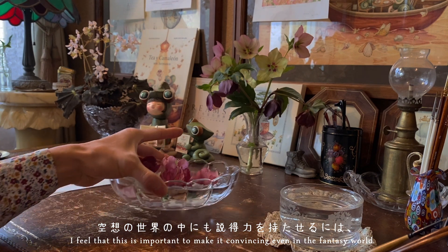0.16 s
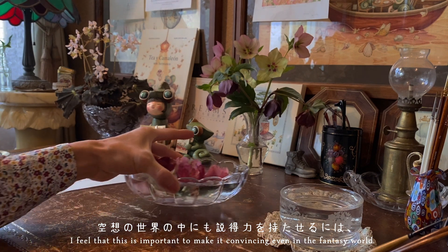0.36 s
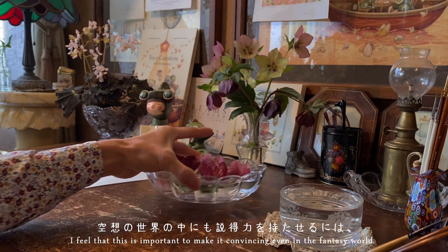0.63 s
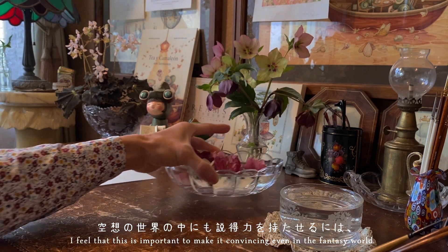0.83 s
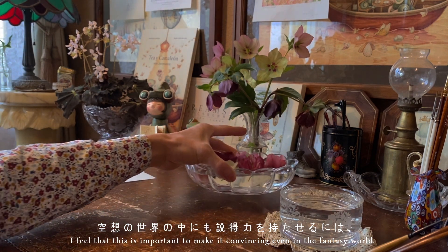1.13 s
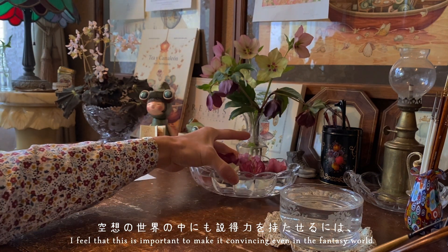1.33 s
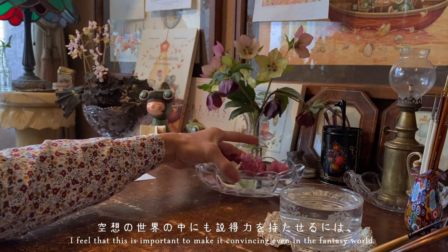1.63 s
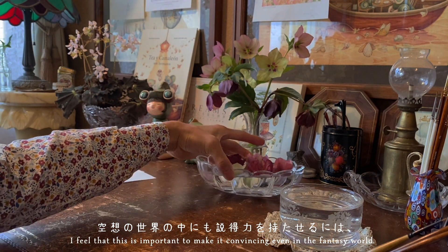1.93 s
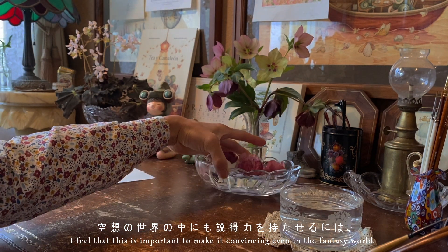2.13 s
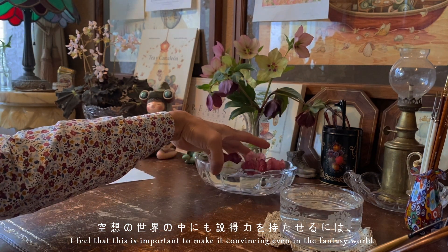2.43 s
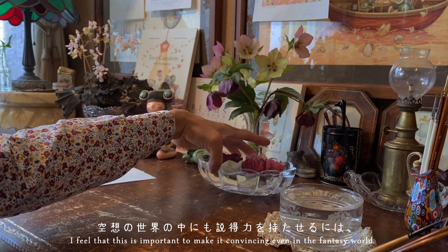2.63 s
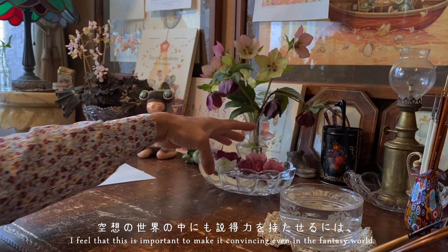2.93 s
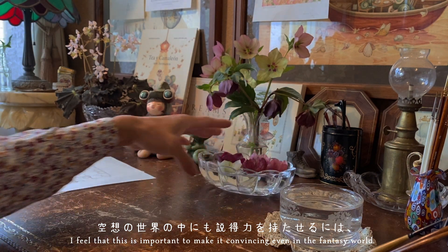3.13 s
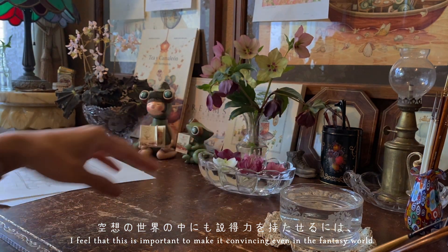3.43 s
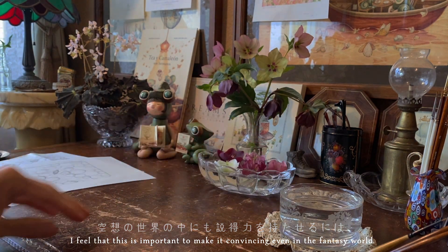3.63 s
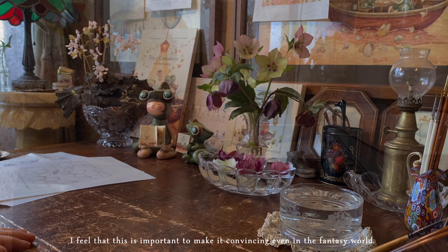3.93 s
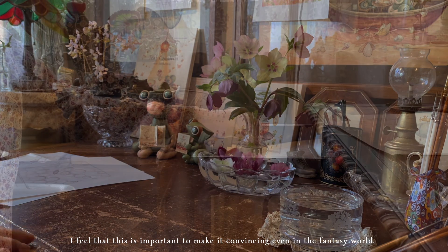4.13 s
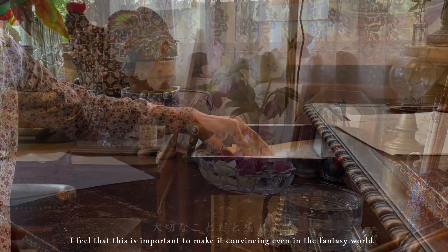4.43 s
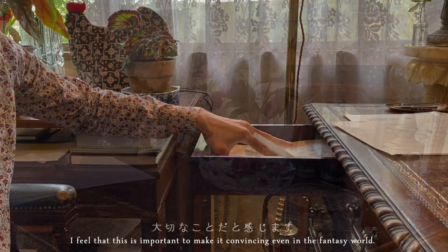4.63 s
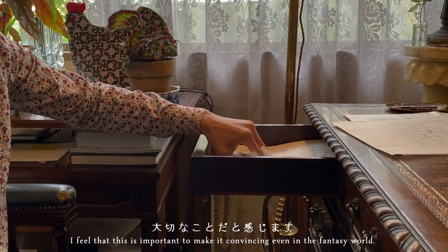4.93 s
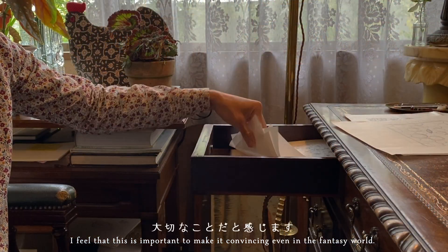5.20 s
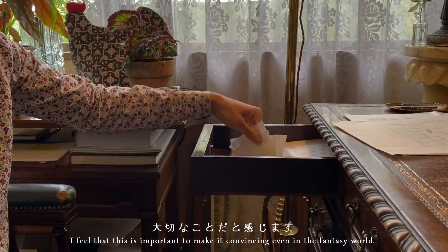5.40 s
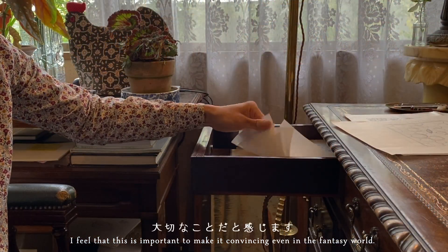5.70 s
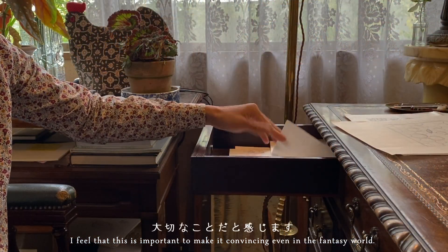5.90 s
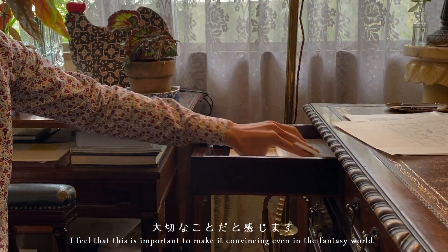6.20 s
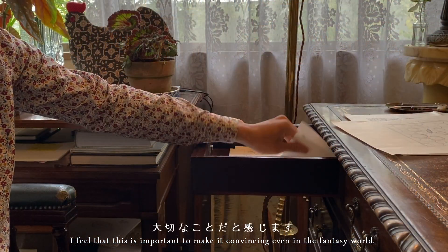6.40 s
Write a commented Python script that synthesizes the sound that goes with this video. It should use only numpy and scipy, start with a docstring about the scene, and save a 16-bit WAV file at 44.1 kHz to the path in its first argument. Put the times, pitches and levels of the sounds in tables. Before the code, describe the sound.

A small, quiet furnished room, heard close in stereo, with a faint low rumble and very soft hiss. From 0 s a sleeve brushes softly; tiny glass ticks come at about 0.1 s, the clearest at 0.17. The cloth swells gently around 1 s. At 1.28 a glass bowl lands on the wooden desk: a deep, loud, quickly dying thump with a slight rattle and clink. Softer bumps and glass ticks follow from 1.58 to 1.84, then near quiet, with barely audible glass touches at 2.8. From 3.4 a hand lightly slides paper. At 4.43 a small knock; from 4.75 the rustling grows firmer, with hard wooden knocks and snaps at 4.87 and 5.0. A very sharp paper snap cracks at 5.31, lesser flicks around 5.75, then knocks at 5.88, 6.07 and 6.29, the last with another snap, as sheets keep scraping to the end.

```python
"""Glass bowl on a desk, papers in a drawer

A sleeve brushes over a wooden desk (soft noise) and a glass bowl is set down with a deep thump (ringing wood)
and a few small clinks (hard ticks with a faint ring). Then a hand leafs through papers in an open drawer:
sheets slide and snap (shaped noise), fingers and paper edges knock on the wood (noise bursts and ringing).
A small, quiet, furnished room adds short echoes; it is heard from close by through a stereo pair of microphone ports."""
import sys
import numpy as np
from scipy import signal
from scipy.fft import rfft, irfft
from scipy.io import wavfile
from scipy.ndimage import uniform_filter1d

SR = 44100
rng = np.random.default_rng(int(sys.argv[2]) if len(sys.argv) > 2 else 0)


def materialize(psi):
    """Save the field psi as 16-bit PCM at rate SR to the path in sys.argv[1].

    A 1-D psi becomes a single channel; in a 2-D psi each row is a channel.
    """
    bounded = np.clip(np.atleast_2d(psi).T, -1, 1)
    quanta = np.round(bounded * 32767).astype(np.int16)
    wavfile.write(sys.argv[1], SR, quanta)


N = 289296  # length [samples]
TIME = np.arange(N) / SR  # [s]
HIT_TIME = TIME[:SR // 2]  # half a second, enough for one short sound [s]


def undb(db):
    """Turn decibels into a gain."""
    return 10 ** (np.asarray(db) / 20)


def unit(x):
    """Scale to an rms level of 1."""
    return x / np.sqrt(np.mean(x ** 2))


def convolve(x, response):
    """Filter along time, keeping the length."""
    filtered = signal.fftconvolve(np.atleast_2d(x), np.atleast_2d(response), axes=1)
    return filtered[:, :x.shape[-1]]


def colour(x, points, tilt_db=0, size=4096):
    """Filter with unit energy through (Hz, dB) points, tilted by tilt_db per octave above 300 Hz."""
    point_hz, point_db = np.transpose(points)
    bin_hz = np.maximum(np.arange(size // 2 + 1), 1) * SR / size
    octave = np.log2(bin_hz)
    db = np.interp(octave, np.log2(point_hz), point_db)
    db = db + tilt_db * np.clip(octave, np.log2(300), None)
    # fold the cepstrum (the spectrum of the log gains) so that the filter responds at once, never early
    cepstrum = irfft(np.log(undb(db)))
    cepstrum[1:size // 2] *= 2
    cepstrum[size // 2 + 1:] = 0
    response = irfft(np.exp(rfft(cepstrum)))
    return convolve(x, response / np.linalg.norm(response))


def stereo_noise(count, width):
    """Left and right noise with a shared part; width is the side level over the mid level."""
    mid, side = rng.standard_normal((2, count))
    return np.array([mid + width * side, mid - width * side]) / np.hypot(1, width)


def walk(rate):
    """Smooth random wandering around zero, with about rate new values a second and a spread near 1."""
    hold = int(SR / rate)
    steps = np.repeat(rng.standard_normal(N // hold + 1), hold)
    return unit(uniform_filter1d(steps, hold)[:N])


def ring(modes, spread, favoured_hz=500, favour_db=0):
    """Sum of decaying tones; the place of the blow favours those near one pitch, by favour_db per octave."""
    out = 0
    for k, (hz, db, t60) in enumerate(modes):
        sign = (-1) ** k
        gain = sign * undb(db - favour_db * abs(np.log2(hz / favoured_hz)))
        # up to 400 Hz, the shorter the wave, the more its phase differs between left and right
        side_phase = spread * min(hz / 400, 1) ** 2 * (-1) ** (k // 2)
        phase = side_phase * np.array([[1], [-1]]) + rng.uniform(-1.3, 1)
        fade = np.exp(-np.log(1000) * HIT_TIME / t60)  # falls 60 dB in t60
        out = out + gain * fade * np.sin(2 * np.pi * hz * HIT_TIME + phase)
    return out / np.linalg.norm(undb(np.array(modes)[:, 1]))


def burst(ms, width, crack):
    """A dying swarm of micro-contacts (fading noise), led by a sharp first contact of size crack."""
    fade = np.exp(-HIT_TIME * 1000 / max(ms, .3))
    out = stereo_noise(len(HIT_TIME), width) * fade / 2
    out[:, 0] += crack
    return out


def add(track, s, sound):
    """Mix a sound into the track at time s [s]."""
    i = int(s * SR)
    track[:, i:i + sound.shape[1]] += sound[:, :N - i]


def pan(x, left_db):
    """Make the left louder than the right by left_db."""
    return x * undb(np.array([[left_db], [-left_db]]) / 2)


def friction(width, grain_db, flutter_db):
    """Fibres catch and let go: noise with fine grains (grain_db) under an unsteady pressure (flutter_db)."""
    level_db = grain_db * walk(1800) + flutter_db * walk(55)
    return unit(stereo_noise(N, width) * undb(level_db))


def crackle(rate, spread_db):
    """Tiny creases give way: lone clicks, rate a second; with spread_db above 0 a few are louder."""
    happens = rng.random(N) < rate / SR
    sign = rng.choice([-1, 1], N)
    size = undb(spread_db * np.minimum(rng.exponential(size=N), 3))
    return unit(happens * sign * size)


def patchy(x, patchy_db, rate):
    """A bending sheet changes its resonances: every third of an octave swells and fades alone."""
    out = 0
    for low in 200 * 2 ** (np.arange(19) / 3):
        high = low * 2 ** (1 / 3)
        band = signal.sosfilt(signal.butter(2, [low, high], "band", fs=SR, output="sos"), x)
        out = -out + band * undb(patchy_db * walk(rate))  # neighbouring bands get opposite signs
    return unit(out)


def air():
    """Steady background: a rumble alike on both sides and a faint, wider hiss, both from filtered noise."""
    # colour of the quiet room: (frequency [Hz], level [dB])
    room_tone = [(20, -15), (35, -12.5), (58, -2), (85, -6.5), (115, -8), (250, -19), (500, -28),
                 (1000, -35.5), (2500, -40), (6000, -45), (10000, -45.5), (15500, -55.5)]
    mid, side = colour(rng.standard_normal((2, N)), room_tone)
    side = signal.sosfilt(signal.butter(2, 260, "high", fs=SR, output="sos"), side)
    return undb(-60.5) * (mid + 0.85 * side * np.array([[1], [-1]]))


def room(x, early_db, early_s, tail_db, t60):
    """Near furniture scatters the sound at once; a short tail follows (both are fading noise echoes)."""
    count = len(HIT_TIME)
    arrive = HIT_TIME > .003  # no echo in the first 3 ms
    early = stereo_noise(count, width=0.99) * arrive * np.exp(-HIT_TIME / early_s)
    tail = stereo_noise(count, width=0.87) * arrive * np.exp(-np.log(1000) * HIT_TIME / t60)
    echoes = (undb(early_db) * unit(early) + undb(tail_db) * unit(tail)) / np.sqrt(count)
    echoes = colour(echoes, [(100, -23.0), (400, 5), (1500, 3.5), (6000, -1.5), (16000, 0.5)])
    return x + convolve(x, echoes)


def sleeve():
    """Cloth brushes softly as the arm reaches over the desk and draws back: noise in bell-shaped swells."""
    # moves of the arm: (middle [s], half length [s], level [dB])
    arm_moves = [(0.084, 0.17, -56.5), (0.444, 0.18, -60.5), (0.977, 0.41, -56.5), (1.445, 0.24, -61),
                 (1.835, 0.2, -65), (3.199, 0.3, -69)]
    # colour of the cloth: (frequency [Hz], level [dB])
    cloth_colour = [(150, 8.5), (400, 0.5), (800, -6), (1500, -7), (3000, -6), (5500, -11.5), (8000, -11),
                    (12000, -15), (16000, -21)]
    power = 0
    for middle, half, db in arm_moves:
        bell = np.exp(-((TIME - middle) / half) ** 2)
        power = power + (undb(db) * bell) ** 2
    cloth = friction(width=0.53, grain_db=-0.5, flutter_db=1.5)
    return np.sqrt(power) * colour(cloth, cloth_colour)


def desk():
    """Each push rings the desk; a longer, softer contact leaves only its low modes."""
    # weight coming down on the desk: (time [s], level [dB], contact time [ms])
    thumps = [(1.2741, -4.5, 1.88), (1.283, -2.5, 5.1), (1.39, -31.5, 2.2), (1.579, -48.5, 1.6),
              (1.623, -25, 6.5), (1.646, -20, 14), (1.837, -25, 6.6), (3.611, -44, 1.6), (4.653, -40, 3.9),
              (4.795, -44, 2.8), (4.872, -34, 1.77), (4.99, -36, 2.8), (5.14, -32, 4.9), (5.312, -36, 1.7),
              (6.398, -32, 4.4), (6.472, -36, 2.5)]
    # ringing modes of the desk: (frequency [Hz], level [dB], time to fall 60 dB [s])
    desk_modes = [(62.4, -4.5, 0.29), (83, -17.5, 0.43), (110, -6.5, 0.278), (126.6, 0, 0.26),
                  (156.1, 0.5, 0.2), (190, -12.5, 0.31), (234, -2, 0.33), (263, -10, 0.23), (298, -6, 0.17),
                  (328.6, -1.5, 0.25), (367, 1.5, 0.21), (395.5, -7.5, .11), (460, -7.5, .12),
                  (463, -9.5, 0.078), (542, 0, 0.081), (568, -2, 0.061), (600, -4.5, .06),
                  (748, -12.5, 0.13)]
    # colour of the rattle: (frequency [Hz], level [dB])
    rattle_colour = [(300, -3.5), (700, 3.5), (1300, -3), (2600, -9), (5000, -18), (12000, -27)]
    thump, rattle = np.zeros((2, 2, N))
    # the top first flexes briefly under the load, then its modes take over
    flex = np.exp(-HIT_TIME / .004) * np.sin(2 * np.pi * 400 * HIT_TIME)
    body = ring(desk_modes, spread=0.7) + undb(2.5) * flex
    for s, db, ms in thumps:
        push = np.sin(np.pi * np.minimum(HIT_TIME * 1000 / ms, 1)) ** 2
        add(thump, s, undb(db) * convolve(body, push / push.sum()))
        # the harder and shorter the jolt, the more the small things standing on the desk rattle
        add(rattle, s, undb(db) * undb(-25) / ms * burst(ms=34, width=0.65, crack=1.9))
    thump = signal.sosfilt(signal.butter(4, [52, 700], "band", fs=SR, output="sos"), thump)
    return thump + colour(rattle, rattle_colour)


def bowl():
    """Glass touches glass and wood: small hard ticks, each with a ring of the glass."""
    # touches: (time [s], level [dB], tilt [dB per octave], ring [dB re the level], favoured pitch [Hz])
    clinks = [(0.078, -44, -1, -30, 5000), (0.097, -40.5, 0, -15, 7000), (.173, -27, 1, -23, 1400),
              (1.285, -29, -2, -20, 5100), (1.581, -37.5, -6.5, -25, 1320), (1.786, -44, -6, -25, 1320),
              (1.8097, -34.5, -0.5, -16, 5400), (1.83, -52, 0, 7, 1320), (2.816, -61.5, 2, 1.5, 3000),
              (2.862, -78, -4, 18, 1320)]
    # ringing modes of the glass: (frequency [Hz], level [dB], time to fall 60 dB [s])
    glass_modes = [(1340, -2.5, 0.1), (2530, -13, 0.18), (5100, -0.5, 0.087), (5500, -10.5, .11),
                   (7350, -13.5, .14)]
    # colour of the tick: (frequency [Hz], level [dB])
    tick_colour = [(150, 6), (500, -5), (1400, 3.5), (3000, -10.5), (7500, -7), (12000, -8.5), (16000, -12)]
    out = np.zeros((2, N))
    for s, db, tilt_db, ring_db, favoured_hz in clinks:
        tick = colour(burst(ms=4.8, width=0.75, crack=0.21), tick_colour, tilt_db)
        glass = ring(glass_modes, 1.0, favoured_hz, favour_db=7)
        add(out, s, undb(db) * (tick + undb(ring_db) * glass))
    return out


def drawer():
    """Knocks chatter on the box, ring its modes and land once more just after."""
    # knocks: (time [s], level [dB], tilt [dB per octave], chatter time [ms], favoured pitch [Hz],
    #          ring [dB re the level], rebound [dB re the level])
    knocks = [(3.428, -46.5, -2.5, 23.5, 990, -0.5, -7), (4.417, -38.5, 8, 32, 1000, 2, -10),
              (4.434, -22, 1, 8, 4600, 3, -14), (4.584, -34.5, -0.5, 22, 660, 7.5, -4),
              (4.872, -14, -2, 3, 1570, 4, -14), (4.980, -21, 2.5, 13.3, 990, 2, -2),
              (5.003, -24.5, -2.5, 7.3, 375, -1, -8), (5.877, -24, -2, 7.4, 1700, -28, -12),
              (6.066, -16, -1.5, 9.4, 784, -1, -1.5), (6.286, -14.5, 4, 10.2, 378, -3.5, -6.5),
              (6.338, -30.5, -5, 25, 705, -8, -8), (6.399, -29.5, -1, 10.6, 1020, 4.5, -2)]
    # ringing modes of the drawer box: (frequency [Hz], level [dB], time to fall 60 dB [s])
    box_modes = [(250, -10, 0.13), (375, 0, 0.13), (668, 0, 0.13), (695, 2.5, 0.084), (759, -2, 0.09),
                 (936, 2, 0.08), (1045, -3, 0.089), (1173, -3, .09), (1313, 4, 0.023), (1622, -1, 0.08),
                 (1769, -1, .085), (1878, 2.5, 0.08), (2430, 0, 0.039), (3430, -4, .03), (4216, -2, .05),
                 (4652, -4, .07)]
    # colour of the chatter: (frequency [Hz], level [dB])
    knock_colour = [(80, -29.5), (250, -7.5), (550, -2.5), (1000, 1), (2000, 3), (2800, 0), (4200, 2),
                    (7000, -9.5), (11000, -17.5), (16000, -31)]
    # the sheet or finger lands a second time and chatters longer
    rebound_s, rebound_longer = .0085, 1.42  # delay [s], times the first chatter
    out = np.zeros((2, N))
    for s, db, tilt_db, ms, favoured_hz, ring_db, rebound_db in knocks:
        first = colour(burst(ms, width=0.39, crack=3.0), knock_colour, tilt_db)
        second = colour(burst(ms * rebound_longer, width=0.58, crack=1.6), knock_colour, tilt_db)
        wood = ring(box_modes, .45, favoured_hz, favour_db=11)
        add(out, s, undb(db) * (first + undb(ring_db) * wood))
        add(out, s + rebound_s, undb(db + rebound_db) * second)
    return out


def snaps():
    """A sheet buckles or flicks off a fingertip: a brief noise; the longer the crinkle, the softer its start."""
    # snaps: (time [s], level [dB], crinkle time [ms])
    flicks = [(3.672, -33.5, 2.6), (4.871, -15, 9.1), (4.962, -24, 10), (4.984, -13, 4.5),
              (5.154, -21.5, 12), (5.3087, -2.5, 1.87), (5.315, -19.5, 7.4), (5.338, -25, 6.9),
              (5.571, -29.5, 17), (5.736, -17.5, 2.2), (5.791, -22, 6.1), (6.289, -9, 3.2)]
    # colour of the snap: (frequency [Hz], level [dB])
    snap_colour = [(150, -3), (600, -13), (1500, -4), (4000, -2.5), (7200, 4.5), (10500, -1), (16000, -6)]
    out = np.zeros((2, N))
    for s, db, ms in flicks:
        build_up_s = 0.41 * ms / 1000  # a share of the crinkle time
        swell = np.minimum(HIT_TIME / build_up_s, 1)
        crinkle = swell * burst(ms, width=0.23, crack=0)
        add(out, s, undb(db) * colour(crinkle, snap_colour))
    return out


def stroke(start, length):
    """A sheet gathers speed, slides evenly and comes to rest."""
    attack_s, release_s = 0.023, 0.029
    attack = np.clip((TIME - start) / attack_s, 0, 1)
    return attack * np.exp(-np.maximum(TIME - start - length, 0) / release_s)


def hand():
    """Gains of rub, wood and edge: the light touch plus every stroke, summed in power."""
    # pushes of the hand that slide a sheet: (start [s], length [s], rub [dB],
    #          wood under it [dB re rub], crisp edge [dB re rub])
    strokes = [(3.512, 0.042, -65.5, 12, -23), (3.571, 0.04, -48.5, 0.5, -7), (3.638, 0.04, -52, 0.5, -8),
               (3.813, 0.025, -50, 1, -0.5), (3.901, 0.082, -50, -11, -3), (4.012, 0.1, -50, -13, -10),
               (4.156, 0.057, -47.5, -1.5, -1), (4.233, 0.086, -52, -2.5, -2),
               (4.414, 0.034, -45.5, -8, -6), (4.545, 0.051, -47, -4.5, -1.5),
               (4.746, 0.087, -60.5, 13.5, 1), (4.837, 0.1, -45.5, -1, -10),
               (5.007, 0.081, -42.5, -11, -5.5), (5.106, 0.058, -43, -8, -4),
               (5.263, 0.11, -45.5, -3.5, -6), (5.458, .04, -46.5, -2.5, -4.5),
               (5.588, 0.12, -53, -0.5, 0.5), (5.736, 0.044, -49, -7.5, 1), (5.914, .12, -53, -20, -5),
               (6.092, 0.21, -44.5, -7, -6), (6.232, 0.13, -44, -1.5, -9), (6.404, 0.1, -41.5, -1.5, -2)]
    # the hand rests on the pile and shifts it lightly, more firmly as it digs in
    touch_s, touch_rise_s = 3.387, 0.33  # start and fade-in time [s]
    touch_db, touch_db_per_s = -59.5, 3  # level at the start [dB] and its growth [dB per s]
    touch_wood_db, touch_edge_db = -2, -5  # [dB re rub]
    since = TIME - touch_s
    touch = np.clip(since / touch_rise_s, 0, 1) * undb(touch_db + touch_db_per_s * since)
    power = np.outer(undb([0, touch_wood_db, touch_edge_db]), touch) ** 2
    for start, length, db, wood_db, edge_db in strokes:
        gains = undb([db, db + wood_db, db + edge_db])
        power = power + np.outer(gains, stroke(start, length)) ** 2
    return np.sqrt(power)


def sliding():
    """Sheet rubs on sheet, edges scrape crisply, and the wood beneath answers with a hollow sound."""
    # colours of rub, wood and edge, each: (frequency [Hz], level [dB])
    rub_colour = [(500, -11.5), (1300, -4), (2200, 3), (3000, 3.5), (4400, 5.5), (5600, 1), (7500, 1.5),
                  (10000, -21), (16000, -3)]
    hollow_colour = [(30, -4), (60, 13.5), (120, 4), (250, 1), (700, -3), (1080, 3), (1600, -3.5),
                     (3000, -28.5)]
    crisp_colour = [(3000, -40), (6000, -11), (8000, 8.5), (10000, 5), (12500, 3.5), (16000, -5.5)]
    rub_gain, hollow_gain, crisp_gain = hand()
    fibres = patchy(friction(width=0.48, grain_db=0.0, flutter_db=2.5), patchy_db=1, rate=14)
    fibres = fibres + undb(-13.5) * crackle(rate=90, spread_db=3.5)
    wood = friction(width=0.38, grain_db=0.0, flutter_db=4.0)
    edges = friction(width=0.07, grain_db=0.8, flutter_db=0.7)
    edges = edges + undb(-6.5) * crackle(rate=210, spread_db=0.0)
    rub = rub_gain * colour(fibres, rub_colour)
    hollow = hollow_gain * colour(wood, hollow_colour)
    crisp = crisp_gain * colour(edges, crisp_colour)
    return rub + hollow + crisp


def scene():
    """Paper, cloth, glass and drawer sit a little to the left, the desk in the middle, over the room's air."""
    near = pan(bowl() + sleeve(), left_db=4.5)
    near = near + pan(snaps() + sliding(), left_db=1.7)
    near = near + pan(drawer(), left_db=1.4)
    near = room(near, early_db=-9, early_s=0.027, tail_db=-13.5, t60=0.24)
    wood = room(desk(), early_db=-11.0, early_s=0.012, tail_db=-13, t60=0.29)
    return near + wood + air()


def record(dry):
    """Microphone ports: narrower stereo in the treble, the left about a quarter ms late; the top is cut."""
    low_hz, high_hz, turn_hz = 6900, 15300, 4200  # band of the delay; each side turns half a cycle per turn_hz
    hz = np.arange(N + 1) * SR / (2 * N)
    left, right = rfft(dry, 2 * N)
    mid = (left + right) / 2
    side = (left - right) / 2 * np.interp(hz, [6000, 7000], [1, .55])
    # the left is turned back and the right forward
    lag = np.exp(-1j * np.pi * (np.clip(hz, low_hz, high_hz) - low_hz) / turn_hz)
    ports = irfft(np.array([(mid + side) * lag, (mid - side) / lag]))[:, :N]
    return signal.sosfilt(signal.ellip(10, .2, 70, 15900, fs=SR, output="sos"), ports)


dry = scene()
out = record(dry)
materialize(out)
```